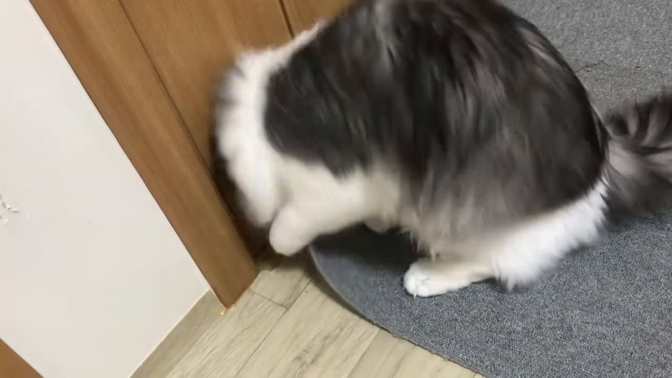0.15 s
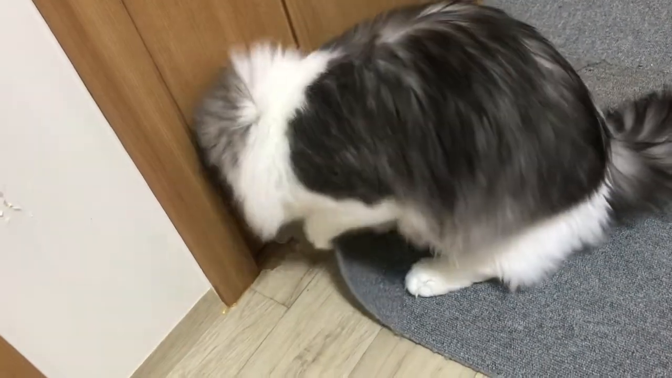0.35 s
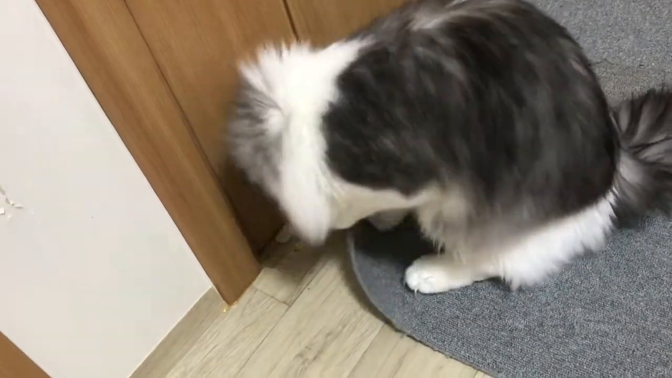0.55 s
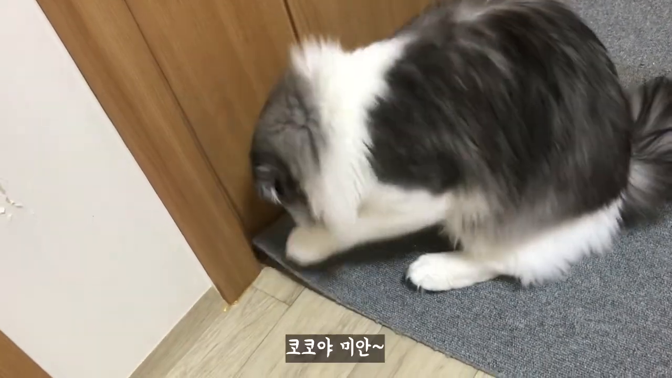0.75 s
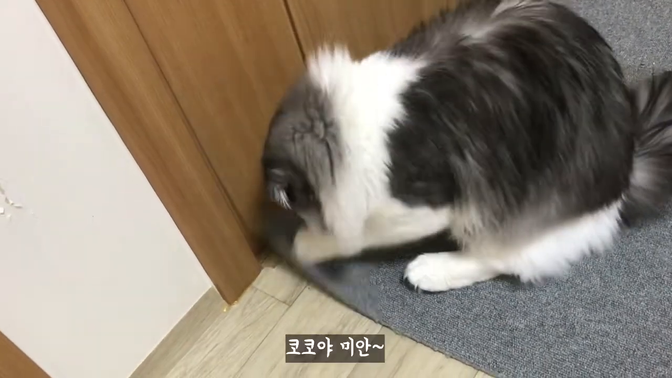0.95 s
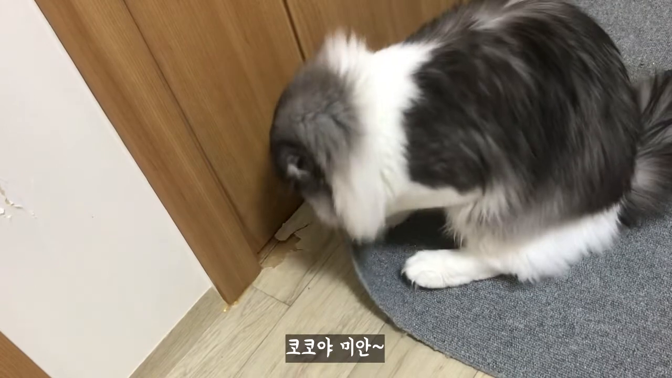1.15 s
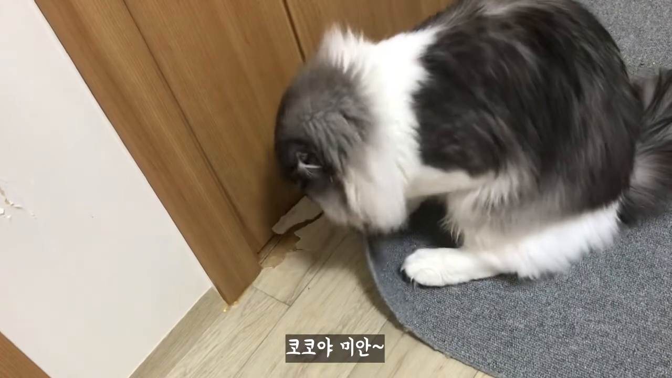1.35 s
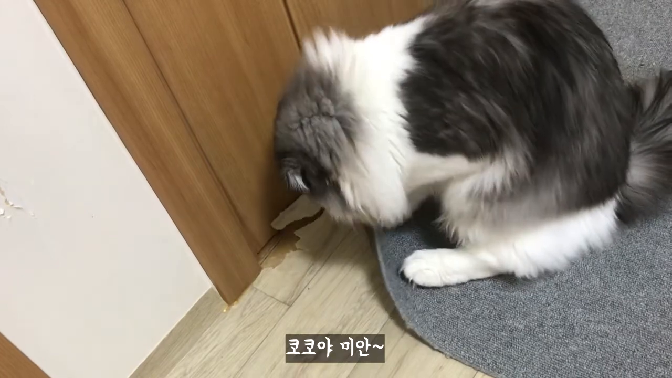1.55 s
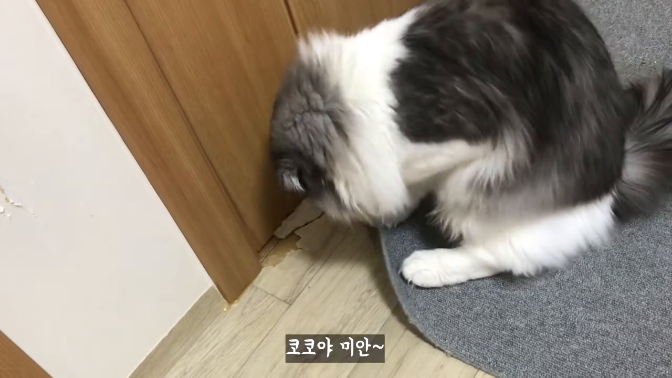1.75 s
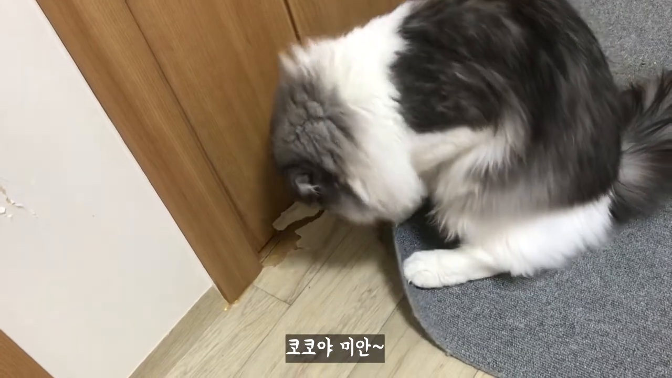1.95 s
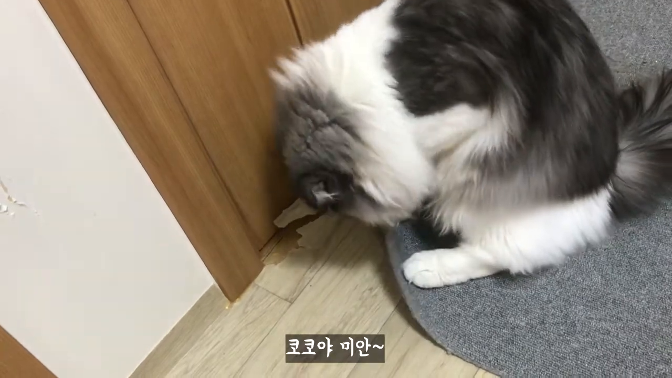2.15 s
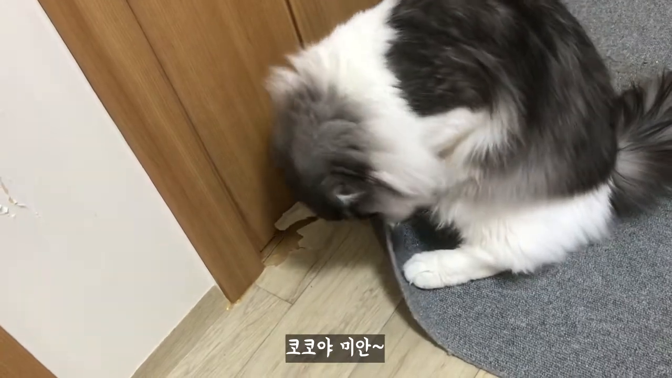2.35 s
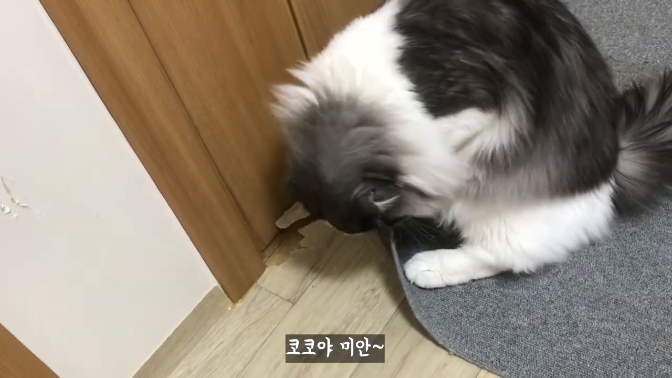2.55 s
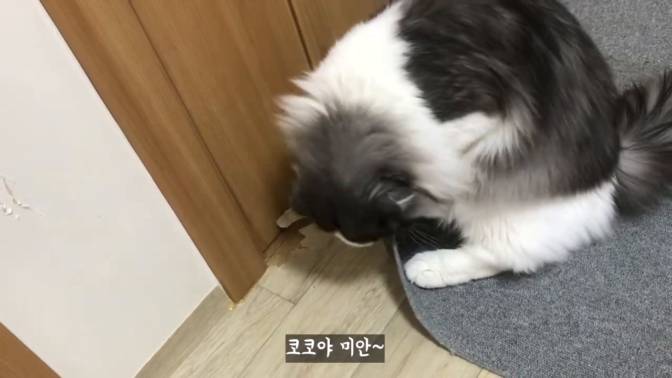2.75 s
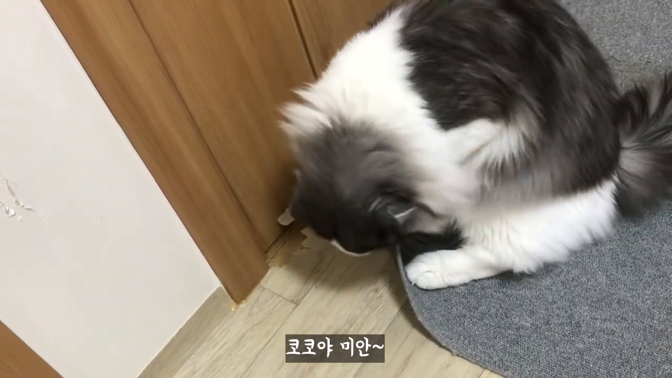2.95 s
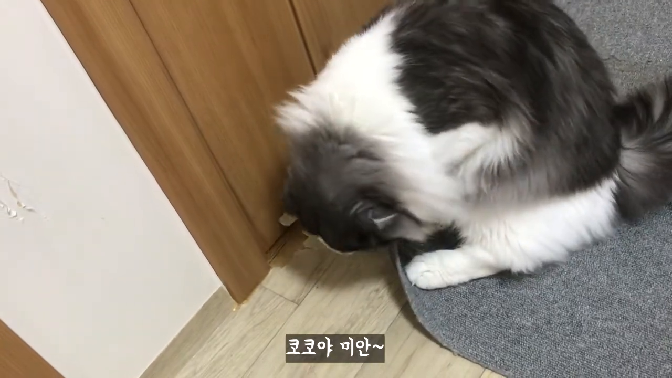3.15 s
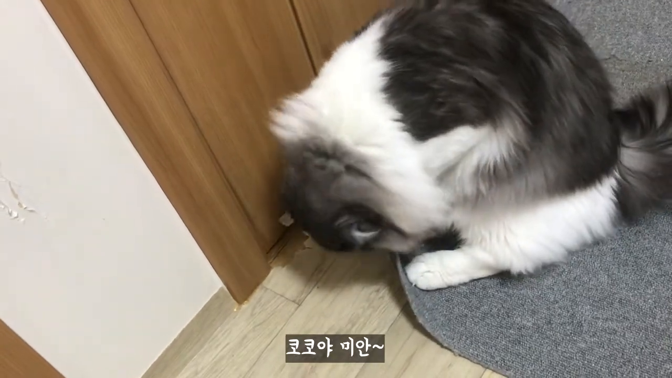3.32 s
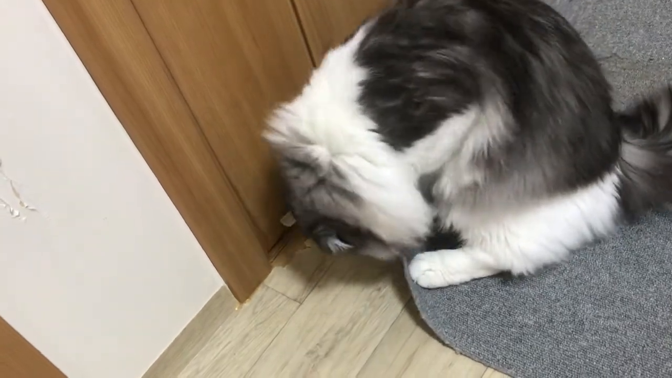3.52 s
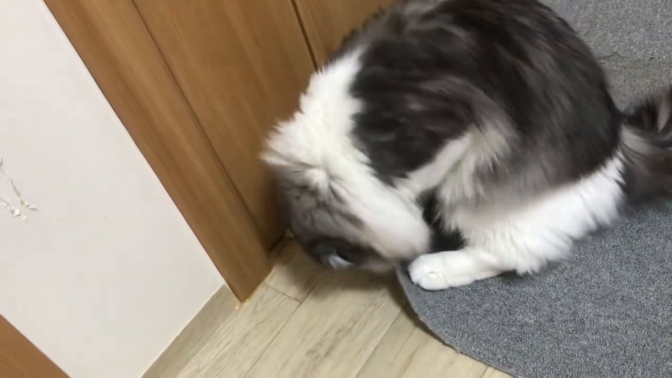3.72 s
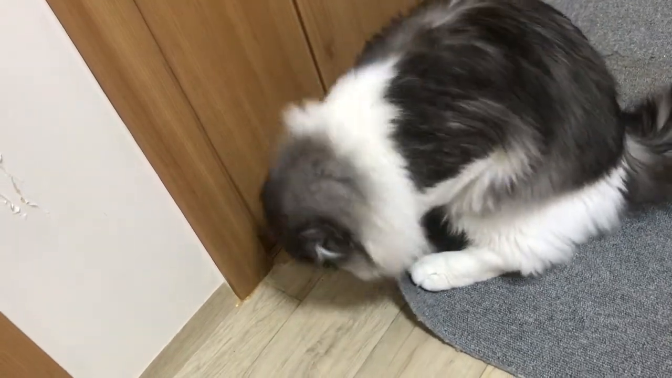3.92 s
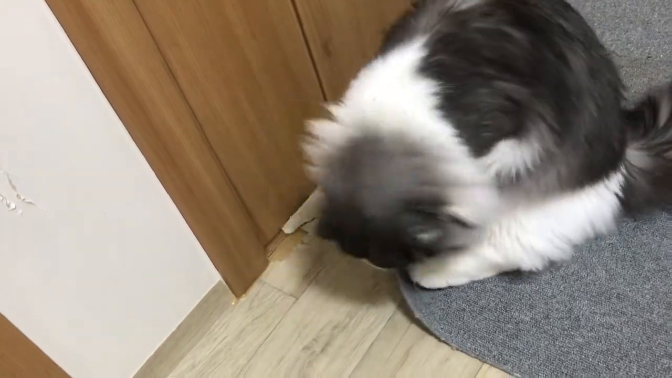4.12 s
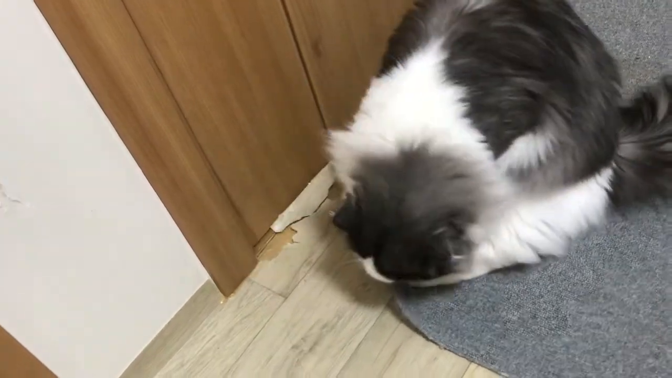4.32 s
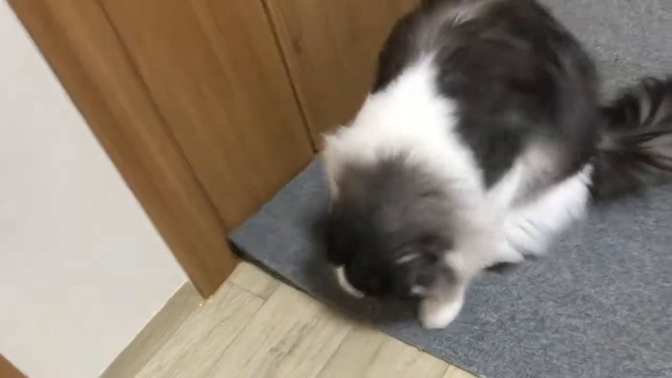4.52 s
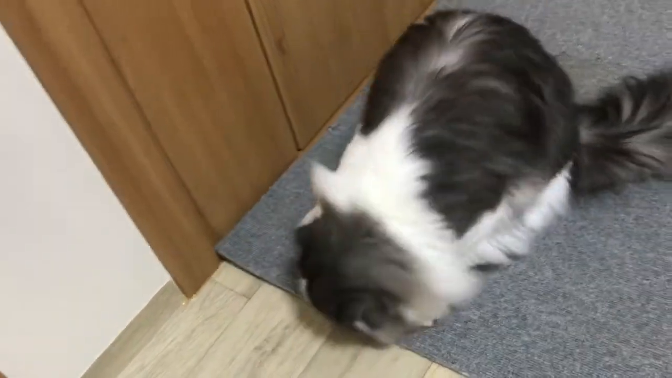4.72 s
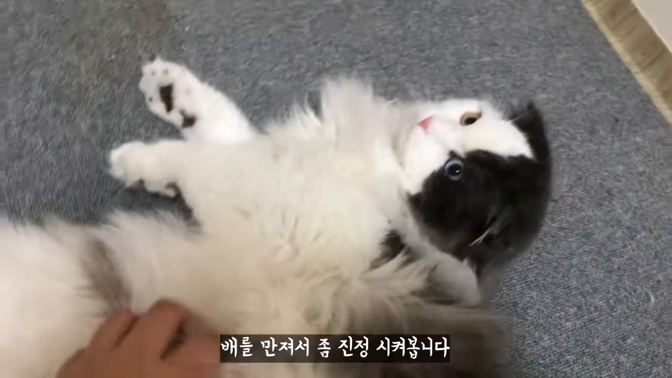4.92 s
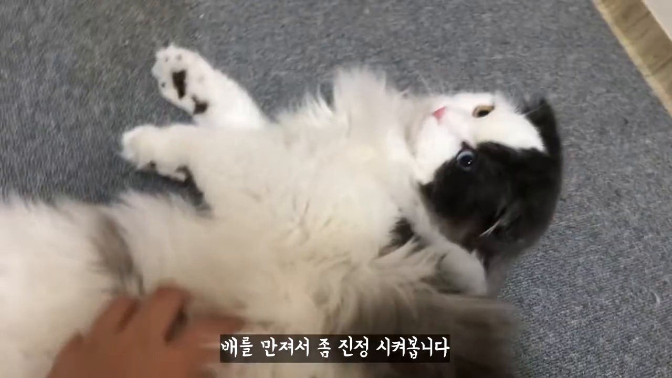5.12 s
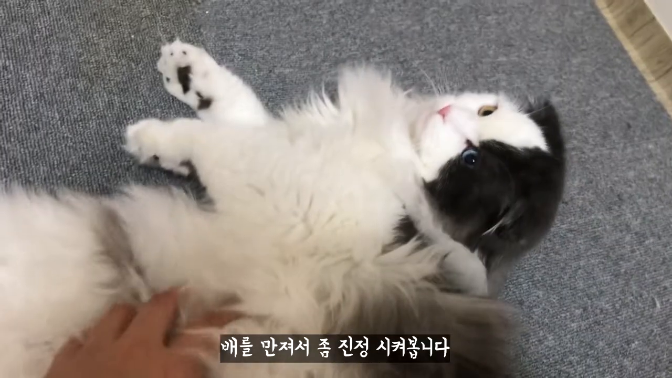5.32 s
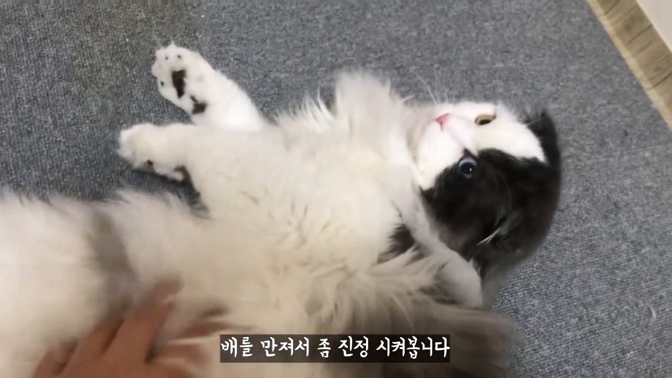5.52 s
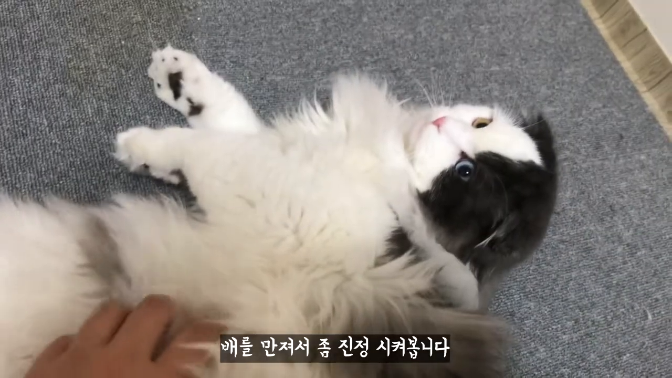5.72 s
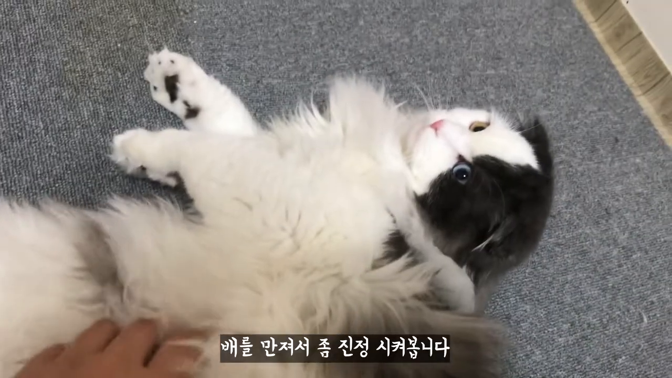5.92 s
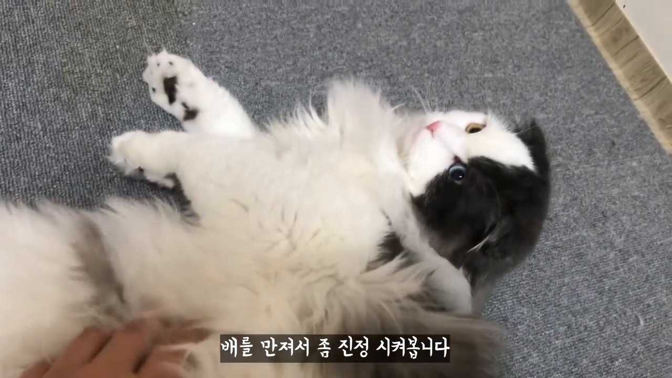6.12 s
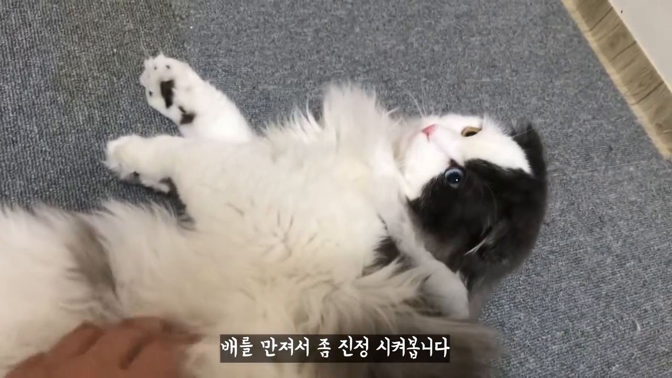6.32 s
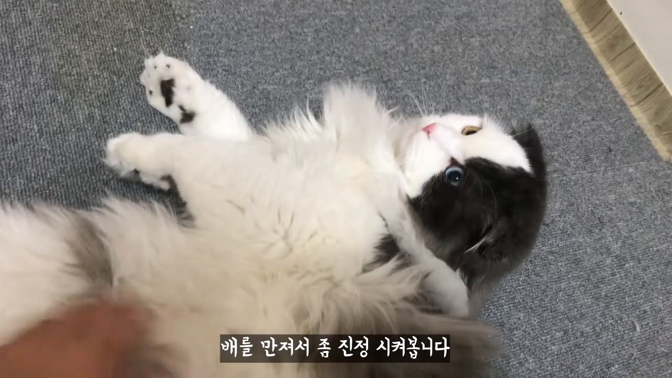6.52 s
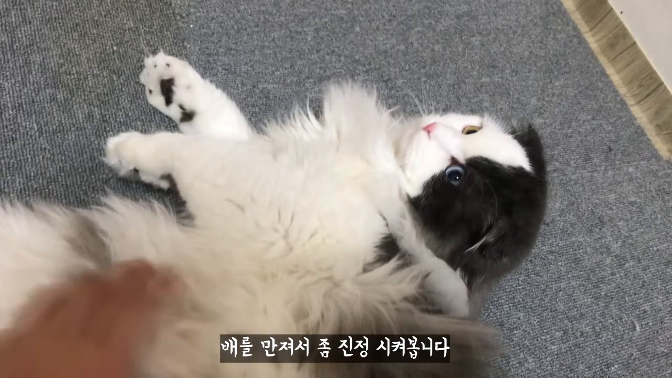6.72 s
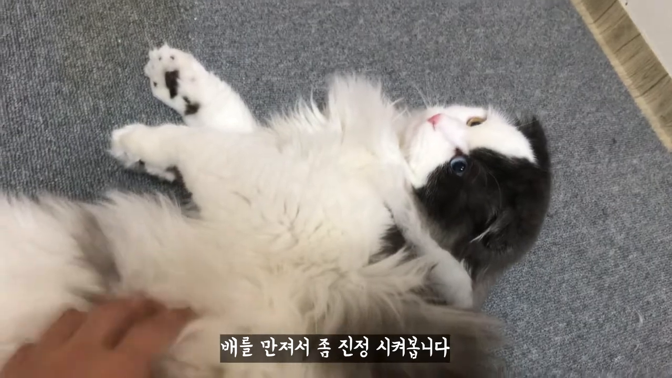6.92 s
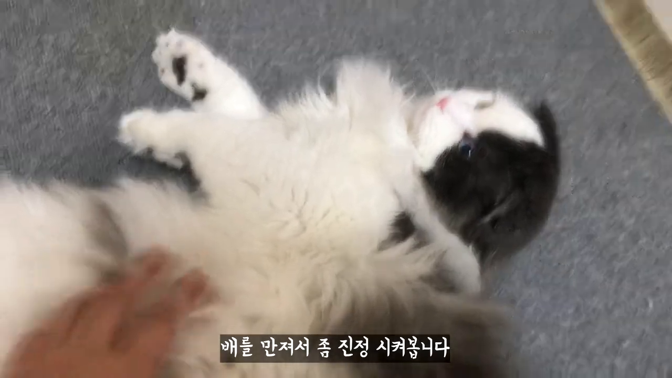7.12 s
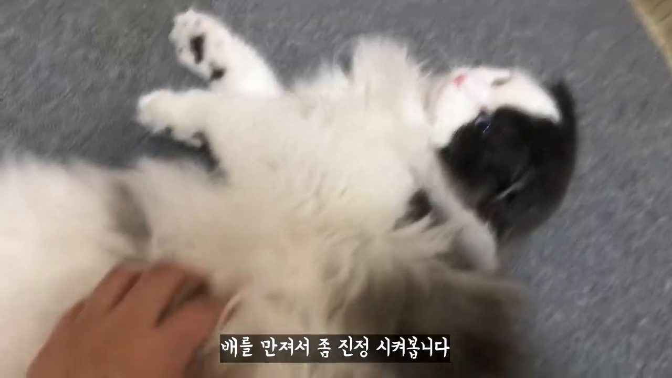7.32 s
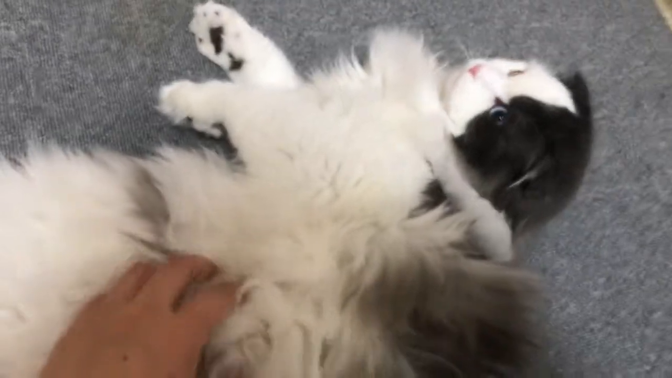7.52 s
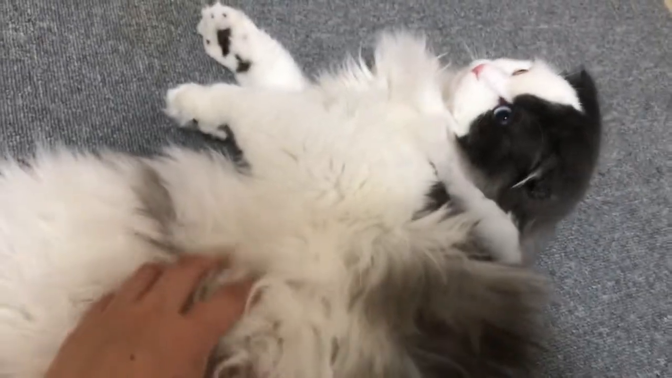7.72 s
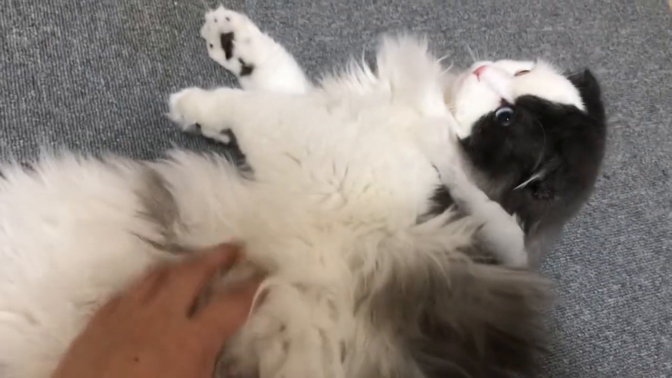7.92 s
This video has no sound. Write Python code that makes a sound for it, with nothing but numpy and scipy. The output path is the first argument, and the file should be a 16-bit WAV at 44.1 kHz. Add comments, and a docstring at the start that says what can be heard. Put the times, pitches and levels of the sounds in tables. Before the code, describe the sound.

A cat butts a wooden door, which knocks sharply in its frame, rattles lightly, then knocks twice more. Paws and fur swish faintly over the floor. After a softer knock, a mat flops down. The sound then moves close to the cat, which purrs softly, breathing out and in. Faint air and a low hum fill the small room.

```python
"""A small room with a wooden door, one microphone. A cat paws and butts at the door, which knocks and
chatters in its frame; paws and fur swish over the floor, and a lifted mat scuffs and flops back down.
Then the cat lies close to the microphone and purrs while it is stroked: pulses from its larynx thump
the chest and rasp the throat, breathing out and in. Room air and a low hum lie underneath."""
import sys
import numpy as np
from scipy import signal
from scipy.fft import rfft, irfft, next_fast_len
from scipy.io import wavfile
from scipy.ndimage import uniform_filter1d, map_coordinates

SR = 44100
rng = np.random.default_rng(int(sys.argv[2]) if len(sys.argv) > 2 else 0)


def inscribe(sig):
    """Save sig as 16-bit PCM at rate SR to the path in sys.argv[1].

    A 1-D sig is mono; a 2-D sig holds one channel per row.
    Samples are clipped to [-1, 1] before scaling.
    """
    pcm = np.round(np.clip(np.atleast_2d(sig).T, -1, 1) * 32767)
    wavfile.write(sys.argv[1], SR, pcm.astype(np.int16))


N = 355446
CLOSE_UP_S = 4.92  # from here on the microphone is beside the purring cat

# The door meets its frame; the soft, low row at 0.183 s is the cat's head pushing the door. Each row: # start
# in seconds, relative level in dB, contact hardness as a cutoff in Hz, body pitch in Hz, # edge boost at 2-3
# kHz in dB, relative click level in dB.
KNOCKS = [(.1690, -13, 9000, 660, 0, 1), (0.1727, -.5, 15000, 800, -1.5, -4),
          (0.1814, -6.5, 11140, 596, -1, -11), (.1830, -18, 192, 550, 0, -20),
          (0.1875, -4.5, 13000, 600, 2.5, -5), (0.6939, -24, 12000, 595, -5, 9),
          (.7380, -22.5, 6000, 604, -7, 2), (.7510, -25.5, 7000, 590, 2, -3),
          (.7770, -29.5, 9000, 556, -8, 6), (.8420, -31.5, 8000, 910, 16, 7),
          (1.7557, -34, 14000, 594, 3, 13.5), (1.8167, -14, 9000, 665, -9, 5),
          (1.8243, 0, 11700, 578, 4, 2), (2.2879, 0, 12100, 594, 5, 1.5), (2.3009, -19, 11100, 700, -1, 1),
          (4.4892, -12.5, 4150, 517, 3, -24), (4.5871, -28.5, 2500, 700, 15, -4)]
# One blow as the panel radiates it, at a body pitch of BLOW_BODY_HZ. Each row: frequency in Hz, gain in dB.
BLOW_TONE = [(30, -58), (70, -25), (115, -3), (200, -13), (320, 0), (430, -7), (580, 1), (790, -7),
             (1130, -9.5), (1700, -22), (3700, -24.5), (4700, -29.5), (6800, -31), (15000, -38.5)]
BLOW_BODY_HZ = 580
# Modes of the door panel and the floor. Each row: frequency in Hz, relative level in dB, t60 in seconds.
DOOR_MODES = [(115.6, 4.5, 0.23), (285, -1.5, 0.38), (324, -7.5, 0.39), (343, 13, 0.14), (497, -22, 0.16),
              (559.6, 10, 0.14), (582, -1.5, 0.33), (663, -8.5, 0.55), (786, 0, 0.087), (915, -22, 0.67),
              (954, -14, 0.36), (1018, -33, 0.71), (1086, -2.5, 0.27), (1220, -23.5, 0.19),
              (1295, -2.5, 0.22), (1375, -47, 0.21)]
FLOOR_MODES = [(61.1, -3.5, 0.61), (85, -9, 0.36), (110.5, 4.5, 0.14), (162, 5.5, 0.059),
               (196, -8.5, 0.032), (274.4, -11.5, 0.27), (348, -27, .15)]

# The purring breaths. Each row: start and end in seconds, first and last pulse rate in Hz,
# direction (0 out, 1 in), relative strength in dB.
BREATHS = [(4.955, 5.61, 26.9, 26.9, 0, 0), (5.651, 6.21, 26.8, 28.7, 1, -1),
           (6.245, 7.12, 26.4, 24.8, 0, .5), (7.153, 7.725, 27.7, 26.4, 1, 1),
           (7.765, 8.5, 25.6, 25.4, 0, -.5)]
# Effort over a breath, out then in. Each row: attack and release in seconds, depth of both in dB,
# mid-breath slackening in dB.
BREATH_EFFORT = [(0.058, 0.28, 8.5, 0), (0.061, 0.043, 3.5, 2.5)]
# The chest's resonances. Each row: frequency in Hz, width in Hz, relative level in dB.
CHEST_MODES = [(79.7, 12, 6.5), (108.6, 12.5, 2.5), (121, 12, -1), (153.5, 28, -14), (174, 28, -23),
               (242, 25, -21.5), (288, 15, -18.5), (366, 28, -12)]
# Close up: the throat, the nostrils and the in-breath's rasp. Each row: frequency in Hz, gain in dB.
THROAT_TONE = [(120, -17), (200, -1.5), (290, -5.5), (380, -0.5), (470, -19), (700, -17.5), (1200, -24.5),
               (2500, -30.5)]
NOSTRIL_TONE = [(3000, -52), (3700, -20), (3950, -8), (4320, -5.5), (4600, -27), (5500, -43)]
RASP_TONE = [(300, 13.5), (700, -7), (950, 5), (1170, 9.5), (1500, -10), (2100, -4.5), (2500, 0.5),
             (2950, 0), (3400, -1), (4800, -8), (5700, -8), (6450, 0), (7600, -7.5), (9200, -5.5),
             (12000, -36)]

# Soft, heavy bumps of mat and cat. Each row: start in seconds, relative thump, slap and crack in dB.
FLOPS = [(.8650, -38.5, -37, -58), (4.6007, -23.5, -21.5, -28.5), (6.257, -40.5, -72, -90)]
# The mat's edge drags along the door. Each row: start in seconds, level in dB.
SCUFFS = [(.692, -38.5), (.865, -62)]
# Colours of the mat's slap, its scuff and fur on the floor. Each row: frequency in Hz, gain in dB.
SLAP_TONE = [(60, -22), (130, 11), (290, 7.5), (450, -2.5), (750, -0.5), (1100, 2.5), (1900, -7.5),
             (2300, -2.5), (3000, -4), (4900, -12), (6700, -10), (9000, -24), (16000, -29)]
SCUFF_TONE = [(60, -20), (130, 1), (330, 0.5), (600, 0), (1200, -13), (2500, -12), (5000, -25),
              (8000, -27.5), (15000, -35)]
RUB_TONE = [(200, -10), (600, 4.5), (1200, 2.5), (2400, 1.5), (3600, 2), (4800, -3.5), (6500, -4),
            (9000, -10), (16000, -25)]
# Rubbing, hardest while the cat digs at the mat. Each row: time in seconds, relative level in dB.
RUB_LEVEL = [(.08, -56), (.35, -52), (.87, -54.5), (1.05, -58), (1.45, -57), (2.25, -61), (2.6, -58),
             (3.5, -57), (4.3, -59), (4.75, -57)]
# The clearest swishes of paws and fur; narrow ones squeak. Each row: start in seconds,
# relative level in dB, rough centre in Hz, width in Hz, gain of the side resonances in dB.
SWISHES = [(0.357, -44.5, 2910, 650, -28), (1.382, -56, 3340, 600, -12), (1.421, -45, 2450, 960, 1),
           (1.49, -51, 2400, 650, -3), (2.49, -61, 2750, 1300, -15), (2.601, -58.5, 2680, 2000, -15),
           (2.674, -52.5, 2600, 2600, -3), (2.83, -57.5, 5400, 2500, -15), (3.015, -57.5, 2540, 2500, -13),
           (3.3, -59, 3000, 2500, -12), (3.421, -56.5, 3230, 2800, -15), (3.765, -51.5, 2440, 1290, -3)]
# A swish's side resonances. Each row: multiple of its centre, relative level in dB.
SIDE_PEAKS = [(.47, -6.5), (1.7, -5.5), (2.45, -12)]
# Claws, mouth and nose. Each row: start in seconds, level in dB, rough centre in Hz, width in Hz.
TICKS = [(1.152, -54, 7000, 8000), (1.187, -55, 7000, 11000), (1.2215, -54, 5500, 10000),
         (4.908, -52, 3300, 1290), (5.992, -45, 1030, 900), (6.152, -43.5, 4170, 1000),
         (7.223, -42, 4250, 1000)]

# Room air by the door and by the cat, and the room's echo. Each row: frequency in Hz, gain in dB.
AIR_BY_DOOR = [(15, -23), (25, -26), (66, -7), (108, -4), (195, -7), (489, -15), (607, -14.5), (775, -23.5),
               (1290, -22), (1940, -44), (3820, -37), (7110, -32.5), (10400, -33), (12500, -29.5),
               (16000, -36)]
AIR_BY_CAT = [(15, -46), (25, -7), (53, -5), (72, -6), (170, -11), (373, -10.5), (607, -18.5),
              (1130, -20.5), (2110, -27.5), (3720, -28.5), (4870, -33), (6380, -29.5), (7710, -36),
              (12900, -32.5), (16000, -37)]
ECHO_TONE = [(60, -5), (200, -4), (500, -5), (1200, 2.5), (3000, -2), (8000, -0.5), (15000, 0.5)]
# How long the room rings. Each row: frequency in Hz, t60 in seconds.
ECHO_T60 = [(100, 0.42), (300, 0.38), (900, 0.31), (3000, 0.2), (8000, 0.27), (15000, 0.25)]
# The low hum swells and sinks. Each row: time in seconds, relative level in dB.
HUM_LEVEL = [(0, -50.5), (.3, -55.5), (.45, -43), (.9, -46), (1.15, -59), (1.7, -47), (2.0, -53.5),
             (3.9, -57.5), (4.55, -51), (5.8, -52), (6.0, -45), (6.35, -48), (6.5, -52), (8.06, -51)]


def door(blow_db=-3.5, ring_db=-33, click_t60=0.0085, lag_s=0.000886, room_db=-5.5, edge_hz=2400,
         rebound_s=0.0042):
    """Each contact with the frame, or push of the cat's head, sends a bending wave through the panel, rings it
    and stirs the room."""
    out, t = np.zeros(N), clock(SR // 2)
    hz = np.fft.rfftfreq(len(t), 1 / SR)
    # bending waves are dispersive: the treble arrives first, 1 kHz comes lag_s later
    bend = np.exp(-4j * np.pi * lag_s * np.sqrt(1000 * hz))
    edge = np.exp(-2 * np.log2((hz + 1) / edge_hz) ** 2)
    # the door rebounds once after every knock, weaker and brighter
    rebounds = [(s + rebound_s, db - 14.5, hard_hz, body_hz, edge_db + 9.5, click_db + 11.5)
                for s, db, hard_hz, body_hz, edge_db, click_db in KNOCKS]
    for s, db, hard_hz, body_hz, edge_db, click_db in KNOCKS + rebounds:
        colour = amp(along(BLOW_TONE, hz * BLOW_BODY_HZ / body_hz) + edge_db * edge)
        softening = np.sqrt(1 + (hz / hard_hz) ** 12)
        wave = irfft(causal(colour / softening) * bend)
        wave *= amp(blow_db) / np.abs(wave).max()
        click = amp(click_db - 22 - 60 * t / click_t60) * rng.standard_normal(len(t))
        echo = amp(room_db) * room(wave)
        panel = amp(ring_db) * ring(DOOR_MODES, scatter_db=1.5)
        add(out, s, amp(db) * (wave + click + echo + panel))
    return out


def purr(chest_out_db=-47, chest_in_db=-56, throat_out_db=-61, throat_in_db=-60.5, throat_decay_s=0.04):
    """Close up, each pulse thumps the chest and rasps the throat; in-breaths also puff through the nose."""
    outward, inward = larynx()
    pulses = outward + inward
    push, pull = effort()
    close = clock(N) > CLOSE_UP_S
    chest = filtered(pulses, chest_response)
    bursts = signal.fftconvolve(pulses, np.exp(-clock(SR // 10) / throat_decay_s))[:N]
    throat = noise(THROAT_TONE) * bursts
    out = pull * nose(inward)
    for part, out_db, in_db in (chest, chest_out_db, chest_in_db), (throat, throat_out_db, throat_in_db):
        gain = amp(out_db) * push + amp(in_db) * pull
        out[close] += gain[close] * unit(part[close])
    return out


def larynx(jitter_s=0.0007, scatter_db=1.2):
    """The vocal folds open in slightly uneven pulses: one track breathing out, one breathing in."""
    pulses = np.zeros((2, N))
    for start, end, first_hz, last_hz, inward, _ in BREATHS:
        t = np.arange(start, min(end, N / SR), 1 / SR)
        cycle = np.floor(np.cumsum(np.linspace(first_hz, last_hz, len(t))) / SR)
        times = t[np.diff(cycle, prepend=-1) > 0]
        timing, strength = rng.standard_normal((len(times), 2)).T
        at = np.clip((times + jitter_s * timing) * SR, 0, N - 1).astype(int)
        pulses[int(inward), at] = amp(scatter_db * strength)
    return pulses


def effort(slack_at=0.52, slack_width=0.098):
    """Gain of the out-breaths and of the in-breaths: each swells, holds or slackens midway, and fades."""
    gain, t = np.zeros((2, N)), clock(N)
    for start, end, _, _, inward, db in BREATHS:
        attack_s, release_s, depth_db, slack_db = BREATH_EFFORT[int(inward)]
        ends = np.maximum(1 - (t - start) / attack_s, 0) + np.maximum(1 - (end - t) / release_s, 0)
        progress = (t - start) / (end - start)
        slack = np.exp(-((progress - slack_at) / slack_width) ** 2)
        gain[int(inward)] += amp(db - depth_db * ends - slack_db * slack)
    return gain


def chest_response(hz, low_hz=45, high_hz=550):
    """The chest resonates in a few low modes of alternating sign."""
    modes = sum((-1) ** k * amp(db) * 1j * hz * width / (centre ** 2 - hz ** 2 + 1j * hz * width)
                for k, (centre, width, db) in enumerate(CHEST_MODES))
    return modes / (1 + (hz / high_hz) ** 4) * hz ** 4 / (hz ** 4 + low_hz ** 4)


def nose(pulses, nostril_db=-63.5, rasp_db=-58, puff_s=0.0037, lead_s=0.013, leak=0.11, flutter_db=0.2):
    """Each pulse draws a hissing, rasping puff of air through the nostrils."""
    t = clock(SR // 10)
    t -= t.mean()
    # the folds leak a weaker puff just before they open fully
    early = 0.4 * np.exp(-((t + lead_s) / puff_s) ** 2 / 2)
    puff = np.exp(-(t / puff_s) ** 2 / 2) + early + leak * np.hanning(len(t))
    flow = 2 * signal.fftconvolve(pulses, puff, "same") * amp(flutter_db * wobble(90))
    return flow * (amp(nostril_db) * noise(NOSTRIL_TONE) + amp(rasp_db) * noise(RASP_TONE))


def mat(slap_t60=0.026, tail_db=-14, tail_t60=0.28, crack_t60=0.011, grain_db=4.0, room_db=-2.5):
    """The mat scrapes in jerks and lands with a slap, its dying echo and a low thump of the floor; a softer
    bump of the same kind sounds when the stroking hand bumps the cat."""
    out, t = np.zeros(N), clock(SR // 2)
    for s, thump_db, slap_db, crack_db in FLOPS:
        fade = amp(-60 * t / slap_t60) + amp(tail_db - 60 * t / tail_t60)
        crack = amp(crack_db - 60 * t / crack_t60) * rng.standard_normal(len(t))
        slap = amp(slap_db) * fade * noise(SLAP_TONE, count=len(t))
        thump = amp(thump_db - 2) * ring(FLOOR_MODES, scatter_db=4.0)
        add(out, s, crack + slap + thump)
    drag = sum(amp(db) * envelope(clock(N) - s, rise_s=0.0065, hold_s=0.054, t60=0.088)
               for s, db in SCUFFS)
    scuff = drag * unit(noise(SCUFF_TONE) * amp(grain_db * wobble(250)))
    return out + scuff + amp(room_db) * room(scuff)


def paws(grain_db=1.0, faint_count=12, faint_db=-67.5, faint_hz=3340, faint_width_hz=670,
         faint_side_db=-6, spread_octaves=0.65):
    """Paws and fur rub the floor by the door, with clear swishes and faint ones scattered between."""
    rub = amp(curve(RUB_LEVEL) - 3 + grain_db * wobble(60))
    out = rub * patchy(noise(RUB_TONE), depth_db=2.5) * (clock(N) < CLOSE_UP_S)
    times = (np.arange(faint_count) + rng.random(faint_count)) * CLOSE_UP_S / (faint_count + 1)
    centres = faint_hz * 2 ** (spread_octaves * rng.standard_normal(faint_count))
    faint = [(s, faint_db, hz, faint_width_hz, faint_side_db) for s, hz in zip(times, centres)]
    shape = envelope(clock(SR // 2), rise_s=0.018, hold_s=0, t60=0.4)
    for s, db, centre_hz, width_hz, side_db in SWISHES + faint:
        add(out, s, amp(db - 1) * shape * band(centre_hz, width_hz, side_db))
    return out


def ticks():
    """Claws, mouth and nose make tiny, quickly damped clicks."""
    out = np.zeros(N)
    shape = envelope(clock(SR // 2), rise_s=0.00093, hold_s=0, t60=0.021)
    for s, db, centre_hz, width_hz in TICKS:
        add(out, s, amp(db) * shape * band(centre_hz, width_hz))
    return out


def room(x, build_s=0.0043):
    """The room's diffuse echo, which builds up at the microphone over a few milliseconds."""
    hz, t, spectra = signal.stft(rng.standard_normal(SR // 2), SR, nperseg=256)
    decay = amp(along(ECHO_TONE, hz)[:, None] - 60 * t / along(ECHO_T60, hz)[:, None])
    tail = signal.istft(spectra * decay, SR, nperseg=256)[1]
    tail *= 1 - np.exp(-(clock(len(tail)) / build_s) ** 2)
    return signal.fftconvolve(x, tail / np.linalg.norm(tail))[:len(x)]


def room_tone(air_db=-57, hum_db=-2, drone_db=-8, hum_hz=57.9, waver_db=3.0):
    """The air at each of the two microphone positions, and a wavering low hum."""
    t = clock(N)
    air = amp(air_db) * np.where(t < CLOSE_UP_S, noise(AIR_BY_DOOR), noise(AIR_BY_CAT))
    hum = np.sqrt(2) * np.sin(2 * np.pi * hum_hz * t + .5 * wobble(2.7))
    drone = noise([(20, -38), (34, -16), (44, 6), (55, -10.5), (68, -7.5), (120, -22), (400, -81)])
    swell = amp(curve(HUM_LEVEL) + waver_db * wobble(7))
    return air + swell * (amp(hum_db) * hum + amp(drone_db) * drone)


def amp(db):
    """Decibels to gain."""
    return 10 ** (np.asarray(db) / 20)


def unit(x):
    """Scale to rms 1."""
    return x / np.sqrt(np.mean(x ** 2) + 1e-20)


def clock(count):
    """Sample times in seconds."""
    return np.arange(count) / SR


def along(points, hz):
    """Interpolate (Hz, value) points on a log frequency axis."""
    knots_hz, values = np.transpose(points)
    return np.interp(np.log(hz + 1), np.log(knots_hz + 1), values)


def curve(points):
    """Interpolate (seconds, value) points at every sample."""
    return np.interp(clock(N), *np.transpose(points))


def wobble(rate):
    """A smooth random curve, rate knots a second."""
    return map_coordinates(rng.standard_normal(N // 100), [clock(N) * rate], mode="wrap")


def envelope(t, rise_s, hold_s, t60):
    """Rise, hold, then an even decay in dB."""
    return np.clip(t / rise_s, 0, 1) * amp(-60 * np.maximum(t - rise_s - hold_s, 0) / t60)


def filtered(x, response):
    """Filter x by a function of frequency."""
    size = next_fast_len(len(x) + SR // 2)
    return irfft(rfft(x, size) * response(np.fft.rfftfreq(size, 1 / SR)), size)[:len(x)]


def causal(gain):
    """Minimum-phase spectrum with the given gain."""
    cepstrum = irfft(np.log(np.maximum(gain, 1e-6)))
    half = len(cepstrum) // 2
    cepstrum[1:half] *= 2
    cepstrum[half + 1:] = 0
    return np.exp(rfft(cepstrum))


def noise(tone, count=N):
    """Noise of rms 1, coloured by (Hz, dB) points."""
    return unit(filtered(rng.standard_normal(count), lambda hz: amp(along(tone, hz))))


def band(centre_hz, width_hz, side_db=-120):
    """A short noise of rms 1 in one resonance, with weaker ones beside it."""
    peak = lambda hz, k: 1 / (1 + ((hz - k * centre_hz) / width_hz * 2) ** 2) ** 2
    gain = lambda hz: peak(hz, 0.98) + sum(amp(db + side_db) * peak(hz, k) ** 2 for k, db in SIDE_PEAKS)
    return unit(filtered(rng.standard_normal(SR // 2), gain))


def patchy(x, depth_db):
    """Give a noise drifting patches of colour."""
    spectra = signal.stft(x, nperseg=512)[2]
    patches = uniform_filter1d(rng.standard_normal(spectra.shape), size=8, axis=0)
    patches = uniform_filter1d(patches, size=12, axis=1)
    return signal.istft(spectra * amp(depth_db * unit(patches)), nperseg=512)[1][:len(x)]


def ring(modes, scatter_db):
    """Damped modes, struck at slightly new strengths each time."""
    t = clock(SR // 2)
    return sum(amp(db + scatter_db * rng.standard_normal() - 60 * t / t60) * np.sin(2 * np.pi * hz * t)
               for hz, db, t60 in modes)


def add(track, s, sound):
    """Mix a sound in at s seconds."""
    part = track[max(round(s * SR), 0):][:len(sound)]
    part += sound[:len(part)]


def scene():
    """All sources at one microphone: first by the door, then close to the cat."""
    return (door() + mat() + paws() + ticks() + purr() + room_tone())[None]


def record(dry, low_hz=40, top_hz=16150):
    """The microphone sheds the lowest bass and the very top of the treble."""
    bass_cut = filtered(dry[0], lambda hz: causal(hz ** 5 / np.sqrt(hz ** 10 + low_hz ** 10)))
    return filtered(bass_cut, lambda hz: 1 / (1 + (hz / top_hz) ** 120))[None]


dry = scene()
out = record(dry)
inscribe(out)
```